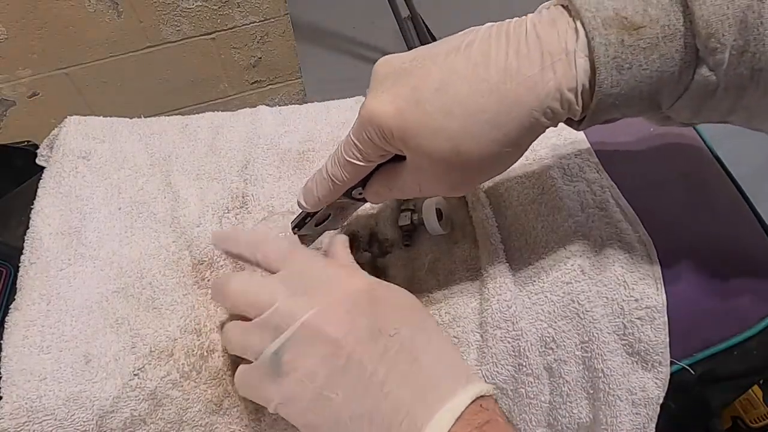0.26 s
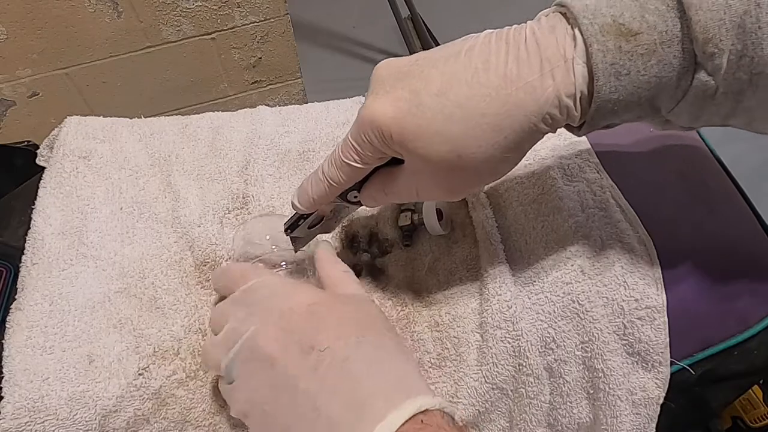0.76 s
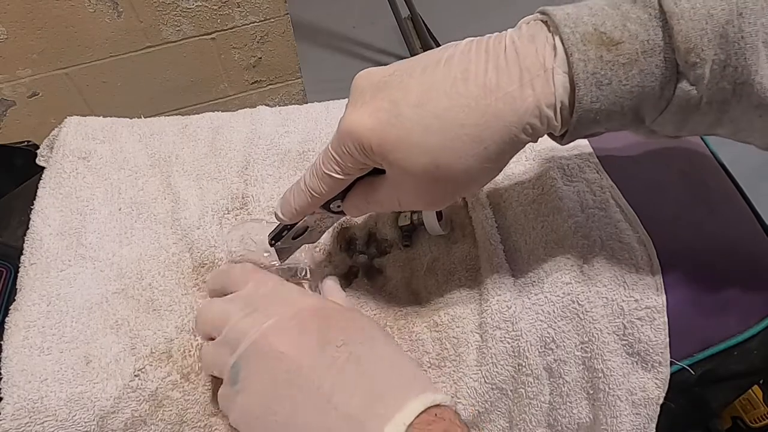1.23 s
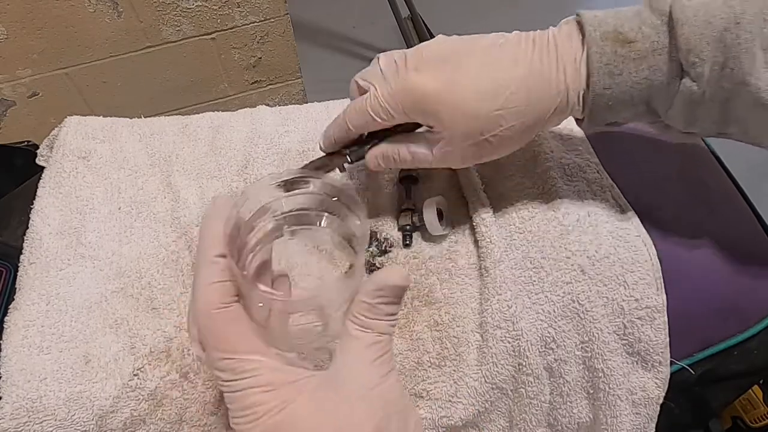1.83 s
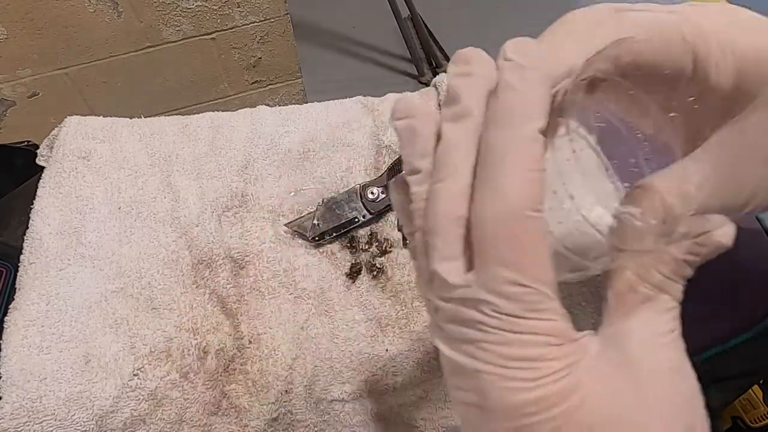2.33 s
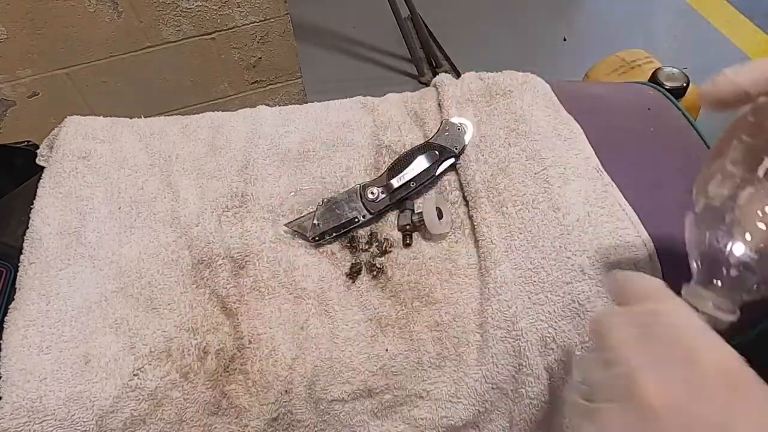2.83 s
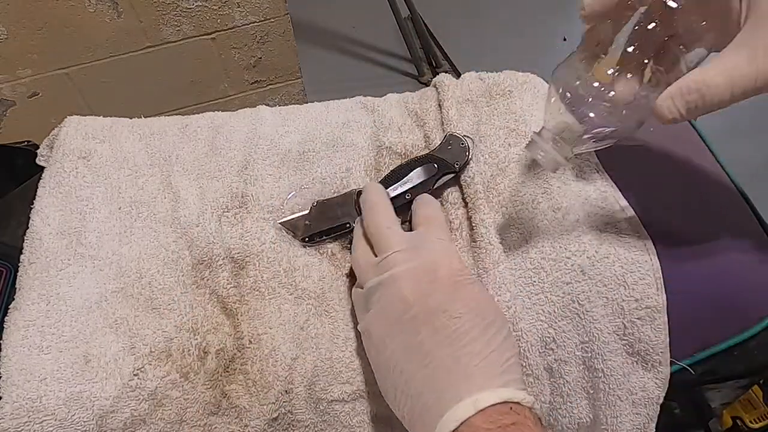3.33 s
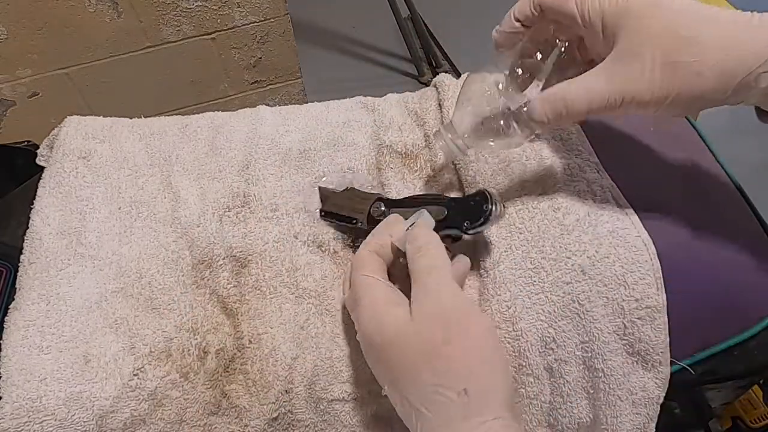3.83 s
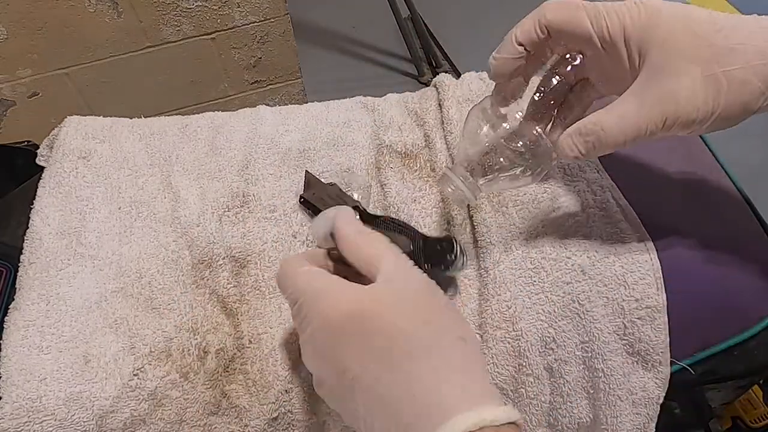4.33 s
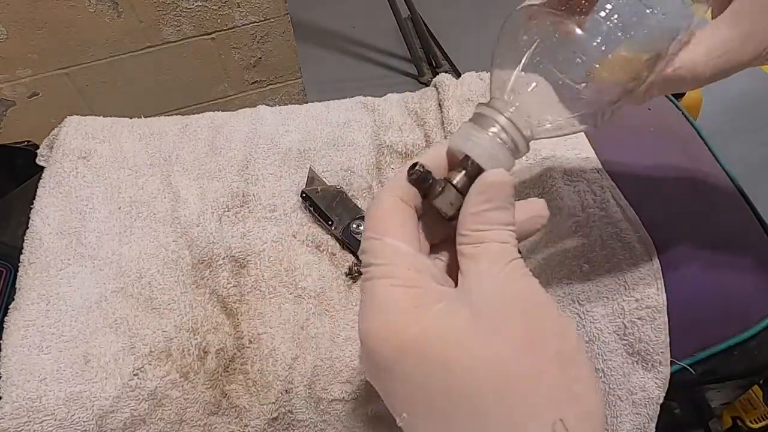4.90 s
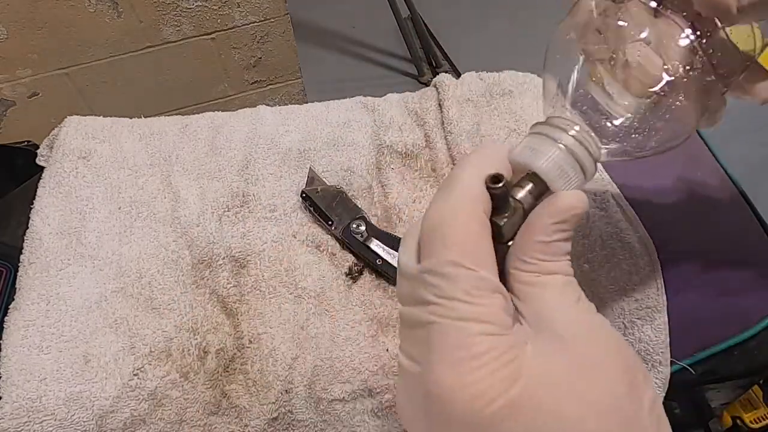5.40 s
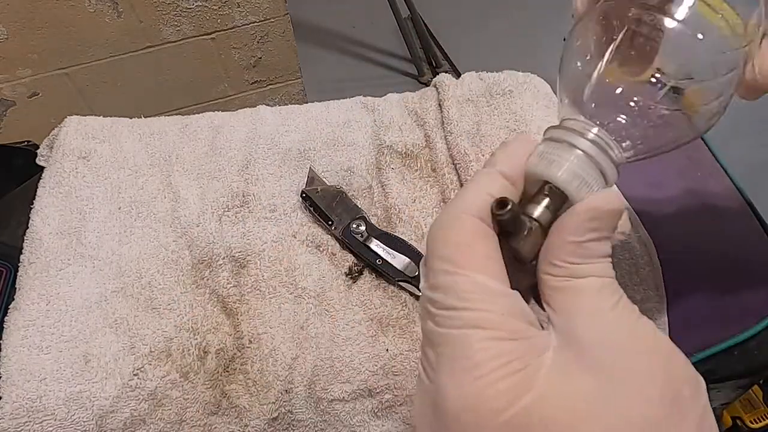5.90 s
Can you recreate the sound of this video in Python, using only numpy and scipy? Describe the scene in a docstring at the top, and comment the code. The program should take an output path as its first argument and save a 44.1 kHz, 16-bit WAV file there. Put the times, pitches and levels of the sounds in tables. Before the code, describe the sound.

Gloved hands cut a thin plastic bottle with sharp crackles and hollow pops, then a knife and small metal parts clink.

```python
"""A quiet workshop, where gloved hands cut, squeeze and turn a thin plastic bottle on a towel, close by.
Creases in the wall buckle with a snap and excite the enclosed air, which resonates in a short hoot.
Gloves rub by stick-slip friction, hands bump the padded table, and the knife and small metal parts
clink in their natural modes. Low tones of far machinery and a dull rumble fill the room."""
import sys
import numpy as np
from scipy import signal
from scipy.fft import rfft, irfft, next_fast_len
from scipy.io import wavfile
from scipy.ndimage import uniform_filter1d, map_coordinates

SR = 44100
rng = np.random.default_rng(int(sys.argv[2]) if len(sys.argv) > 2 else 0)


def master_out(mix):
    """Clip the mix to full scale and print it as 16-bit PCM to the path in sys.argv[1]."""
    frames = np.transpose(np.atleast_2d(mix))
    ceiling = np.clip(frames, -1, 1)
    pcm = np.round(ceiling * 32767).astype(np.int16)
    wavfile.write(sys.argv[1], SR, pcm)


N = 271215

# Levels are relative: each source adds its own gain.
# A far engine gaining speed. Each row: time in seconds, firing rate in Hz, first and second order in dB.
ENGINE_ORDERS = [(0, 58.9, -53, -73), (.8, 61.5, -44, -53), (1.5, 66.1, -35, -64.5), (2.2, 69.57, -35, -53),
                 (2.9, 72.5, -45, -63.5), (3.4, 75.3, -50, -57), (3.8, 76.1, -40, -71.5),
                 (4.4, 74.27, -42.5, -59), (5.1, 77.35, -48.5, -56), (5.4, 77.1, -70, -52),
                 (6.15, 79.4, -39.5, -55)]
# A deep wavering hum. Each row: time in seconds, frequency in Hz, level in dB.
HUM_TRACK = [(0, 50.8, -65.5), (2.1, 45.26, -54.5), (2.4, 47.46, -67), (3.0, 45.55, -71), (3.4, 46.3, -44),
             (3.5, 46.4, -66), (3.6, 45.96, -41.5), (3.8, 49.1, -59.5), (4.05, 48.95, -41),
             (4.25, 49.64, -49), (4.55, 49.94, -40), (4.72, 50.25, -51.5), (4.9, 52.66, -43.5),
             (5.2, 51.3, -66), (5.6, 44.45, -74), (5.9, 44.67, -51),(6.15, 46.9, -44.5)]
# Spectrum of the rumble. Each row: frequency in Hz, spectral density in dB.
RUMBLE_SPECTRUM = [(12, -34.5), (20, -6), (53, -1.5), (140, -3.5), (226, -10.5), (282, -21.5), (544, -28.5),
                   (700, -33), (910, -63), (1540, -120)]
# Envelope of the rumble. Each row: time in seconds, level in dB.
RUMBLE_ENVELOPE = [(0, -45.5), (.8, -54), (2, -52.5), (2.7, -55), (3.5, -49.5), (4.5, -51), (5.3, -52),
                   (6.15, -57)]
# Strokes of gloves, plastic and metal. Each row: peak time in seconds, rustle in dB, hollow over
# rustle in dB, wall resonance in Hz, fade in dB per second, tilt in dB per octave.
RUB_STROKES = [(.09, -59.5, 0, 1360, 61, -2), (.14, -35, 8.5, 2240, 302.5, 0.5),
               (.28, -44.5, -5, 2300, 93, -2), (.36, -49, 9, 2465, 66.5, -1.5), (.5, -44, 6.5, 2662, 49, 2),
               (0.638, -46, 14, 2328, 105, -2.5), (0.762, -38.5, 5, 2236, 74, -0.5),
               (1.03, -50.5, -17, 2200, 100, 3.5), (1.091, -48, -12, 2370, 100, -3),
               (1.288, -51, 6, 2230, 125, -3), (1.43, -40.5, 9.5, 1352, 99.5, 0),
               (1.62, -60.5, 9, 1388, 31, -1), (1.736, -52.5, -15, 3310, 299, 5),
               (2.03, -46, -20, 2848, 100.5, 1), (2.12, -51, -14, 2715, 56.5, -2),
               (2.199, -56.5, 6, 2700, 56.5, -4), (2.57, -49.5, -20, 2970, 190.5, -1),
               (2.648, -49, -1, 1621, 18.5, 1), (2.746, -45, -8, 1700, 499.5, 5),
               (2.866, -42.5, 4, 1916, 409.5, 2), (2.929, -60, 6, 1364, 83, -1),
               (3.042, -51, -18, 1336, 99.5, 1.5), (3.22, -53.5, -23, 2600, 59, -4),
               (3.35, -47.5, -2, 1960, 130, -1), (3.48, -54, -21.5, 2727, 29.5, -7),
               (3.661, -41, 3.5, 2047, 106.5, -1.5), (3.958, -50.5, -12, 2263, 47.5, 2.5),
               (4.101, -52, -4, 2905, 52, -1), (4.249, -53.5, -3, 2940, 159, 2),
               (4.36, -52.5, -31, 2913, 62.5, 1.5), (4.61, -61, -27, 2840, 53.5, 4.5),
               (4.968, -57.5, 13, 1364, 88, 1.5), (5.223, -56.5, 4.5, 1883, 24, -1.5),
               (5.32, -56, -1, 1422, 18, 0.5), (5.55, -56.5, -3.5, 1407, 42.5, -1),
               (5.711, -60, -2, 1345, 83, 0), (5.95, -61.5, 4.5, 1376, 28, 1), (6.1, -57, 9, 2936, 54, 5.5)]
# Faint friction between strokes. Each row: time in seconds, rustle in dB, hollow over rustle in dB.
RESTING_FRICTION = [(0, -47, 10), (.45, -60.5, -18), (.95, -63, 16.5), (1.2, -60, 8), (1.95, -58.5, -25),
                    (2.5, -63, 5.5), (3.0, -75, 12.5), (3.5, -54.5, 4.5), (4.3, -60.5, -19.5),
                    (4.9, -74.5, 14.5), (5.19, -81, 6), (5.5, -74, 3), (5.86, -80, 8), (6.15, -67, -4)]
# Texture of the rubbing. Each row: time in seconds, ticks over smooth friction in dB,
# jingle over rustle in dB, height of the wall resonances in dB.
RUB_TEXTURE = [(0, -13, -48.5, 1), (1.5, -18, -45.5, 4.5), (1.92, -22.5, -37.5, 4.5),
               (2.05, -6, -39.5, 11.5), (2.55, -13.5, -43, 2.5), (2.7, -15, -38, 18),
               (3.1, -12.5, -32, 2.5), (3.25, -1.5, -8, 2.5), (4.06, -15.5, -11, 11), (4.1, -2.5, -21, 9.5),
               (5.15, -16, -37.5, 0), (6.15, -13.5, -41, 9.5)]
# Spectrum of the rustle. Each row: frequency in Hz, spectral density in dB.
RUSTLE_SPECTRUM = [(500, -28), (1100, 6), (1600, 0.5), (3000, -1), (4500, -4.5), (7000, -13), (9500, -15.5),
                   (13000, -41), (15000, -35.5), (16500, -57.5)]
# Dull drag through the padded table. Each row: frequency in Hz, spectral density in dB.
TOWEL_SPECTRUM = [(120, -14), (250, 2.5), (400, -2), (600, -15), (1000, -37.5)]
# Creases flipping. Each row: start in seconds, snap level in dB, panel frequency in Hz,
# crack over snap in dB, hoot level in dB.
CREASE_FLIPS = [(.062, -32, 2165, -6, -31), (.0657, -39.5, 1400, -3, -30),
                (0.0685, -24.5, 1353, -20.5, -37.5), (0.0753, -38, 1400, -1, -20),
                (0.0855, -36, 1400, -6, -27), (0.097, -27, 4740, -1.5, -58), (0.1037, -22, 1490, -8, -12),
                (.1125, -33, 1490, -15, -21.5), (.1209, -40.5, 1490, -12, -28),
                (0.1384, -22, 1450, -5.5, -21), (0.1439, -21.5, 2870, -17.5, -17),
                (.1527, -30, 2890, -8, -30), (0.158, -15, 3375, -3, -31.5), (0.2088, -25, 1370, -4, -26),
                (.225, -25, 2336, -11, -26.5), (0.2751, -17, 3760, -5.5, -54.5), (.28, -30, 4440, 3.5, -16),
                (0.35, -31.5, 2170, -4.5, -31.5), (0.394, -32.5, 1910, -10, -46),
                (0.4306, -21.5, 2534, -49, -23), (0.445, -33.5, 2400, -21, -39),
                (0.4674, -21.5, 1380, -21.5, -28), (0.489, -8.5, 3770, -10.5, -58),
                (0.5047, -29, 2364, -32.5, -20.5), (0.6193, -21.5, 2000, -14, -32),
                (0.6233, -20.5, 1465, -3.5, -52), (0.6295, -20.5, 3950, -9, -13),
                (.652, -33.5, 2040, -7, -48.5), (0.734, -27.5, 2400, -13, -25.5),
                (0.743, -10, 2336, -8.5, -17.5), (.753, -16, 1954, -30.5, -17.5),
                (0.7784, -24.5, 2080, -7, -21.5), (0.7966, -35.5, 1660, 5, -19.5),
                (0.8184, -30, 3400, 4.5, -37), (1.0146, -26, 2286, -5.5, -42),
                (1.0287, -22.5, 4900, -1, -40), (1.0672, -28, 3250, -25, -34),
                (1.0774, -30, 2400, -26, -45), (1.0823, -34, 2302, -16, -35),
                (1.1011, -27.5, 2270, -13.5, -28.5), (1.134, -34, 1920, -15, -42),
                (1.2765, -30.5, 2360, -14.5, -34), (1.2817, -25, 2265, -25, -41),
                (1.2867, -23, 2230, -35, -35), (1.295, -17.5, 2265, -7.5, -24.5),
                (1.388, -27, 1902, -2.5, -22.5), (1.398, -25.5, 1410, -8, -20.5),
                (1.4114, -14.5, 4990, -13.5, -24), (1.4187, -15.5, 1330, -2.5, -17.5),
                (1.426, -34, 2645, 1, -34), (1.443, -41, 2470, 2, -18.5), (1.4521, -21, 1750, 4, -14.5),
                (1.476, -36, 2700, -3, -41), (1.602, -38, 2300, -7.5, -63), (1.65, -47, 1700, -7, -52),
                (2.5605, -39, 2950, -8.5, -43), (2.5687, -36, 2030, -11, -41), (2.575, -31, 2030, -30, -43),
                (2.868, -50, 1900, -18, -49), (2.8734, -48, 1865, -7.5, -30),
                (2.877, -30.5, 2130, -13, -59), (3.6457, -38, 1545, -33.5, -18.5),
                (3.6713, -41, 2100, -5.5, -28.5), (4.8559, -43, 4360, -10.5, -46),
                (4.8674, -43.5, 1405, -6, -30), (4.951, -37, 3030, -1, -23.5),
                (4.9856, -34.5, 2860, -11, -28), (5.05, -54, 4540, -4, -48), (5.096, -57, 2940, -9, -46),
                (5.207, -57, 1300, -30, -44), (5.2221, -42, 1504, -22, -39.5),
                (5.308, -47, 1685, -5.5, -49), (6.0461, -64.5, 2693, 11, -38.5)]
# Spectrum of a contact's crack. Each row: frequency in Hz, level in dB.
CRACK_SPECTRUM = [(300, -34), (1000, 7), (2500, 4), (5000, 2), (8000, -8), (11000, -10.5), (14000, -24.5),
                  (16500, -52)]
# Air resonance as the bottle opens and is gripped. Each row: time in seconds, frequency in Hz.
CAVITY_PITCH = [(0, 747), (.7, 819), (1.45, 894), (2.87, 1017), (3.65, 930), (5, 830), (6.15, 737)]
# Bumps on the table. Each row: start in seconds, level in dB, frequency in Hz, T60 in seconds.
TABLE_BUMPS = [(0.068, -35.5, 130, 0.15), (0.1414, -25.5, 189, 0.036), (0.294, -29.5, 126, 0.052),
               (0.751, -38, 155, 0.068), (1.519, -31, 138, 0.076), (2.0134, -25, 174, 0.027),
               (2.186, -38.5, 200, 0.067), (2.39, -43, 403.5, 0.013), (3.353, -41, 246, 0.073),
               (3.647, -29.5, 236, 0.033), (4.103, -42, 248.4, 0.064), (4.245, -43, 313, 0.081),
               (4.164, -46, 506, 0.032), (4.4448, -11.5, 91, 0.031), (4.952, -27.5, 300, 0.0078)]
# Knocks of metal. Each row: start in seconds, level in dB, main mode in Hz, crack over knock in dB.
METAL_KNOCKS = [(1.9743, -7, 2907, -17.5), (1.986, -19, 3045, -24), (2.0117, -14, 3620, -7.5),
                (2.0197, -16, 2581, -14), (2.0278, -25.5, 2870, -23.5), (2.0327, -22, 2550, -16),
                (2.038, -21.5, 3087, -19), (2.0507, -25, 2860, -33), (2.1105, -26, 2902, -36),
                (2.1705, -28.5, 2530, -28), (2.186, -29.5, 2014, -18.5), (2.264, -27, 2494, -22),
                (2.2865, -38, 2670, -22), (3.143, -36.5, 1727, -36), (3.1581, -37.5, 4280, -12),
                (3.214, -38.5, 1756, -9), (3.2772, -23, 2585, -14.5), (3.3483, -35, 1370, -9),
                (3.3644, -38.5, 1740, -20), (3.3725, -32, 1818, -21), (3.4693, -25.5, 2877, -18.5),
                (3.5043, -25.5, 2983, -9.5), (3.5085, -21, 2770, -23), (3.5383, -27.5, 2665, -20),
                (3.5863, -34.5, 1720, -15.5), (3.6456, -11.5, 1649, -7), (3.6498, -24.5, 1775, -21),
                (3.675, -24, 2150, -12), (3.7115, -30, 2377, -6), (3.7224, -23.5, 3653, -36),
                (3.7278, -24.5, 2560, -12.5), (3.7561, -42, 2460, 1.5), (3.7686, -24, 2444, -12.5),
                (3.8464, -27, 2335, -15), (3.8926, -30, 3800, -9), (3.9249, -30, 3967, -2.5),
                (3.9544, -29.5, 2465, -7), (3.9725, -36, 2400, 4), (3.9868, -33.5, 2170, -8),
                (4.0235, -33.5, 6040, -18.5), (4.036, -32.5, 4336, -15.5), (4.048, -39, 5960, -18.5),
                (4.0792, -34, 3390, -7), (4.0969, -10, 2805, -14), (4.106, -24, 2895, -7),
                (4.1657, -36.5, 1770, -0.5), (4.185, -35.5, 2440, -22), (4.2025, -23.5, 2630, -19.5),
                (4.247, -38.5, 2235, -1), (4.255, -29, 2797, -16), (4.269, -27, 3130, -12.5),
                (4.3436, -23, 3600, -12.5), (4.381, -34, 3890, -9.5), (4.4331, -32.5, 4800, -5),
                (4.4412, -21, 2735, -15.5), (4.4539, -29, 2345, -27), (4.5329, -37.5, 4930, -13)]
# Modes of the metal parts. Each row: frequency in Hz, level in dB.
METAL_MODES = [(2200, -12.5), (2950, -11.5), (3800, -14), (4400, -11), (5950, -18)]
# Reverberation of the workshop. Each row: frequency in Hz, T60 in seconds.
ROOM_T60 = [(300, 0.23), (800, 0.05), (2000, 0.092), (6000, 0.056), (14000, 0.11)]
# Stereo width. Each row: frequency in Hz, side over mid in dB.
SIDE_SPECTRUM = [(300, -62), (1500, -67.5), (3000, -40.5), (6000, -26.5), (10500, -21.5), (12000, -1.5)]


def amp(db):
    """Amplitude ratio of a level in decibels."""
    return 10 ** (np.asarray(db) / 20)


def unit(x):
    """Normalisation to an rms of 1."""
    return x / np.sqrt(np.mean(x ** 2) + 1e-20)


def along(points, hz):
    """Interpolation of (Hz, value) points on a logarithmic frequency axis."""
    f, v = np.transpose(points)
    return np.interp(np.log(hz + 1), np.log(f + 1), v)


def curves(rows):
    """Linear interpolation of each column after the time, one value a sample."""
    s, *cols = np.transpose(rows)
    return [np.interp(np.arange(N) / SR, s, c) for c in cols]


def wobble(rate):
    """Smooth random modulation with rate knots a second."""
    return map_coordinates(rng.standard_normal(int(N * rate / SR) + 4), [np.arange(N) * rate / SR])


def filtered(x, response):
    """Filtering as multiplication of the spectrum by a frequency response."""
    m = next_fast_len(x.shape[-1] + 4096)
    return irfft(rfft(x, m) * response(np.fft.rfftfreq(m, 1 / SR)), m)[..., :x.shape[-1]]


def placed(times, rows):
    """Superposition of short sounds, each starting at its time."""
    at = np.round(times * SR).astype(int)[:, None] + np.arange(rows.shape[1])
    return np.bincount(at.ravel(), rows.ravel(), N + rows.shape[1])[:N]


def ring(t, hz, t60, rise):
    """Free vibration of a damped mode, with an onset time constant of rise seconds."""
    return np.sin(2 * np.pi * hz * t) * amp(-60 * t / np.clip(t60, .002, 1)) * (1 - np.exp(-t / rise))


def engine(throb_hz=5.88, throb_peak_s=1.7, throb_ends_s=2.93):
    """Periodic firing gives two harmonics; for a while the lower one throbs in amplitude."""
    firing_hz, first_db, second_db = curves(ENGINE_ORDERS)
    phase = 2 * np.pi * np.cumsum(firing_hz + 1.1 * wobble(8.3)) / SR
    t = np.arange(N) / SR
    throb = 1 + .9 * (t < throb_ends_s) * np.cos(2 * np.pi * throb_hz * (t - throb_peak_s))
    first = amp(first_db - 9 + 1.6 * wobble(4.3)) * throb * np.sin(phase)
    second = amp(second_db - .5 + 3.4 * wobble(7.3)) * np.sin(2 * phase)
    return first + second


def hum():
    """A deep tone of far machinery wavers by random amplitude and frequency modulation."""
    hz, db = curves(HUM_TRACK)
    envelope = amp(db + 6 + 1.7 * wobble(11))
    return envelope * np.sin(2 * np.pi * np.cumsum(hz + .82 * wobble(17)) / SR)


def rumble():
    """Low-frequency noise swells and sinks under slow amplitude modulation."""
    noise = unit(filtered(rng.standard_normal(N), lambda f: amp(along(RUMBLE_SPECTRUM, f))))
    return amp(curves(RUMBLE_ENVELOPE)[0] + 1.8 * wobble(5)) * noise


def strokes(swell_db_per_s=303, release_db_per_s=198, resting_hz=1390):
    """Incoherent strokes add in power; the loudest sets the resonance, and tilt is a weighted mean."""
    s, db, hollow_db, hz, fade, tilt_db = np.transpose(RUB_STROKES)[:, :, None]
    t = np.linspace(0, N / SR, num=3000)
    rest_db, rest_hollow_db = np.array(curves(RESTING_FRICTION))[:, (t * (SR - 1)).astype(int)]
    envelope_db = np.minimum(swell_db_per_s * (t - s), np.abs(fade) * (s - t))
    since_next_peak_s = np.maximum(t - np.append(s[1:], N / SR)[:, None], 0)
    power = amp(2 * (db + envelope_db - release_db_per_s * since_next_peak_s))
    rest = amp(2 * rest_db)
    total = power.sum(axis=0) + rest
    hollow = (power * amp(2 * hollow_db)).sum(axis=0) + rest * amp(2 * rest_hollow_db)
    peak_hz = np.where(power.max(axis=0) > .5 * rest, hz[power.argmax(axis=0), 0], resting_hz)
    tilt_db = (power * tilt_db).sum(axis=0) / total
    return curves(np.transpose([t, 10 * np.log10(total), 10 * np.log10(hollow), peak_hz, tilt_db]))


def ticks(count):
    """Stick-slip: tiny catches at random moments each ring for a few cycles at their own pitch."""
    when, size, pitch = rng.random((count, 3)).T[:, :, None]
    hz = 1800 * 4.5 ** pitch
    catches = amp(16 * size ** 2) * ring(np.arange(400) / SR, hz, 6 / hz, .0001)
    return unit(placed(when[:, 0] * N / SR, catches))


def wall_rustle(peak_hz, tilt_db, grit_db, depth_db):
    """Source and filter: smooth friction and ticks are coloured by two resonances of the wall."""
    peak_hz = peak_hz * np.exp(.07 * wobble(30))  # the grip keeps changing
    smooth = rng.standard_normal(N) * amp(1.6 * wobble(35))
    slips = (smooth + amp(grit_db) * ticks(count=2200)) / np.sqrt(1 + amp(2 * grit_db))
    hz, t, spectrum = signal.stft(slips, SR, nperseg=256)
    hz, at = hz[:, None] + 1, np.clip((t * SR).astype(int), 0, N - 1)
    bump = lambda centre_hz, octaves: np.exp(-(np.log2(hz / centre_hz) / octaves) ** 2)
    patches = uniform_filter1d(uniform_filter1d(rng.standard_normal(spectrum.shape), 4, 0), 12, 1)
    colour_db = along(RUSTLE_SPECTRUM, hz) + tilt_db[at] * np.log2(np.maximum(hz, 1300) / 3000)
    colour_db += 1.6 * unit(patches)
    colour_db += depth_db[at] * (bump(peak_hz[at], .2) + .66 * bump(3950, .19))
    return unit(signal.istft(spectrum * amp(colour_db), SR, nperseg=256)[1][:N])


def stirred_air(centre_hz=900, width_hz=330):
    """Forced vibration: friction noise drives the hollow, two like band-pass resonators in series."""
    drive = rng.standard_normal(N) * amp(2.5 * wobble(40))
    resonator = lambda f: f * width_hz / np.abs(centre_hz ** 2 - f * f + 1j * f * width_hz)
    return unit(filtered(drive, lambda f: resonator(f) ** 2))


def towel_drag():
    """The padded table transmits only the low frequencies of sliding friction."""
    friction = rng.standard_normal(N) * amp(3.5 * wobble(20))
    return unit(filtered(friction, lambda f: amp(along(TOWEL_SPECTRUM, f))))


def jingle(count):
    """Random impacts of loose parts each excite a tone near one of the two highest metal modes."""
    when, size, which, detune = rng.random((count, 4)).T[:, :, None]
    hz = np.where(which < .5, METAL_MODES[-1][0], METAL_MODES[-2][0]) * (1 + .1 * (detune - .5))
    touches = amp(14 * size ** 2) * ring(np.arange(1024) / SR, hz, t60=.015, rise=.0006)
    return unit(placed(when[:, 0] * N / SR, touches))


def rubbing():
    """Sliding friction: each stroke excites the wall, the hollow, the towel and loose metal together."""
    rustle_db, hollow_db, peak_hz, tilt_db = strokes()
    grit_db, jingle_db, depth_db = curves(RUB_TEXTURE)
    rustle = wall_rustle(peak_hz, tilt_db, grit_db, depth_db)
    hollow = amp(hollow_db - 8.5) * stirred_air()
    drag = amp(-11.5) * towel_drag()
    metal = amp(jingle_db - 4 + 3.5 * wobble(15)) * jingle(count=2500)
    return amp(rustle_db - .58) * (rustle + metal + drag) + hollow


def contacts(table, usual_t60, neighbours_hz, neighbours_db,
             dull_db, thin_hz, tail_db, least_rise, ring_db, swing_db):
    """Impulsive excitation: each click is a main mode, its neighbours and a broadband crack."""
    s, db, hz, crack_db = np.transpose(table)[:, :, None]
    t = np.arange(2048) / SR
    t60 = usual_t60 * amp(-.24 * (db + 14))  # hard contacts die sooner
    rise = least_rise + .047 * t60  # long rings start softly
    cycles = hz * t - 1  # counted from the middle of the sharp first swing
    swing = np.sin(2 * np.pi * cycles) * np.exp(-(cycles / .6) ** 2)
    tones = amp(ring_db) * ring(t, hz, t60, rise) + amp(swing_db + .12 * (db + 20)) * swing
    for near_hz, near_db in zip(neighbours_hz.T, neighbours_db.T):
        tones += amp(near_db[:, None]) * ring(t, near_hz[:, None], t60, rise)
    tones += amp(tail_db) * ring(t, hz, t60=.043, rise=.0037)
    colour_db = lambda f: along(CRACK_SPECTRUM, f) - dull_db * np.log2(1 + (f / 7000) ** 4)
    response = lambda f: amp(colour_db(f)) / (1 + (thin_hz / (f + 1)) ** 4)
    hiss = unit(filtered(rng.standard_normal((len(s), len(t))), response))
    decay = amp(-60 * t / (.52 * t60)) + amp(-22.5 - 60 * t / .069)
    crack = amp(crack_db + 6.5) * hiss * decay * (1 - np.exp(-t / (.46 * rise)))
    # A faint hiss and narrow-band noise swell just before each click.
    slow_noise = uniform_filter1d(uniform_filter1d(rng.standard_normal(hiss.shape), 50), 50)
    narrow_band = unit(slow_noise * np.sin(2 * np.pi * hz * t))
    build_up = amp(db - 60 * t[::-1] / .03) * (1 - np.exp(-t[::-1] / .00063))
    lead_in = (amp(crack_db - 18.5) * hiss + amp(-20.5) * narrow_band) * build_up
    return placed(s[:, 0], amp(db) * (tones + crack)) + placed(np.abs(s[:, 0] - t[-1]), lead_in)


def snaps():
    """Snap-through buckling: a crease flips and rings its panel and three neighbours of random pitch."""
    chance = rng.standard_normal((len(CREASE_FLIPS), 6))
    table = np.array(CREASE_FLIPS)[:, :-1]
    panels_hz = table[:, [2]] * np.exp(.42 * np.clip(chance[:, :3], -1.5, 1.5))
    return contacts(table, usual_t60=.016, neighbours_hz=panels_hz, neighbours_db=-12 + 2 * chance[:, 3:],
                    dull_db=1.5, thin_hz=300, tail_db=-41, least_rise=.00005, ring_db=-8.5, swing_db=2.5)


def hoots():
    """Cavity resonance: as the wall bends, the air swells into a short hoot over a dull knock."""
    s, *_, db = np.transpose(CREASE_FLIPS)[:, :, None]
    t, chance = np.arange(4096) / SR, rng.standard_normal((len(s), 5))
    decay_scale_s = .025 * np.exp(.2 * chance[:, [4]])
    hz = np.interp(s, *np.transpose(CAVITY_PITCH)) * (1 + .025 * chance[:, [3]])
    finger_damping = 1 / (1 + (t / (.26 * decay_scale_s)) ** 4)
    main = ring(t, hz, 2.1 * decay_scale_s, .0018) * finger_damping
    # A weaker, slightly higher tone of random pitch is added.
    upper = amp(-6) * ring(t, (1.043 + .14 * np.abs(chance[:, [0]])) * hz, 1.3 * decay_scale_s, .0016)
    wall_knock = amp(-17 + 1.2 * chance[:, [1]]) * ring(t, 380 * np.exp(.43 * chance[:, [2]]), .054, .0031)
    swell = -amp(db - 15) * ring(t[:1024], hz, .022, .00057)[:, ::-1]
    return placed(s[:, 0], amp(db + 4.5) * (main + upper + wall_knock)) + placed(s[:, 0] - t[1023], swell)


def thuds():
    """Cushioned impact: through the towel, hands and bottle excite one low, heavily damped mode."""
    s, db, hz, t60 = np.transpose(TABLE_BUMPS)[:, :, None]
    return placed(s[:, 0], amp(db + 5.5) * ring(np.arange(8192) / SR, hz, t60, rise=.35 / hz))


def clinks():
    """Modal vibration: knife and metal parts ring near the same modes, at new strengths each knock."""
    hz, db = np.transpose(METAL_MODES)
    chance = rng.standard_normal((len(METAL_KNOCKS), 2, len(hz)))
    modes_hz, modes_db = hz * (1 + .026 * chance[:, 0]), db + 4 * chance[:, 1]
    return contacts(METAL_KNOCKS, usual_t60=.013, neighbours_hz=modes_hz, neighbours_db=modes_db,
                    dull_db=5, thin_hz=1727, tail_db=-24, least_rise=.000081, ring_db=-1.5, swing_db=-3.5)


def reverberation(x):
    """Each frequency decays at its own rate; the room's impulse response changes as the bottle moves."""
    out, step, delay = np.zeros(N + SR), SR // 4, 90
    for start in range(0, N, step):
        hz, t, spectrum = signal.stft(rng.standard_normal(SR // 3), SR, nperseg=128)
        tail = signal.istft(spectrum * amp(-60 * t / along(ROOM_T60, hz)[:, None]), SR, nperseg=128)[1]
        wet = signal.fftconvolve(x[start:start + step], tail / np.linalg.norm(tail))
        out[start + delay:][:len(wet)] += wet
    return out[:N]


def scene():
    """The sources superpose almost equally in both channels; only the treble flickers between them."""
    near = snaps() + clinks() + hoots()
    mid = near + amp(-14) * reverberation(near) + thuds() + rubbing() + engine() + hum() + rumble()
    side = filtered(mid * unit(wobble(590)), lambda f: amp(along(SIDE_SPECTRUM, f)))
    return np.array([mid + side, mid - side])


def record(dry, top_hz=16450):
    """Band limiting, with opposite shelves that leave the left channel duller in the highest treble."""
    lean_db = lambda f: along([(10500, .0056), (12000, 1.1)], f) * np.array([[-1], [1]])
    return filtered(dry, lambda f: amp(lean_db(f)) * (f < top_hz))


dry = scene()
out = record(dry)
master_out(out)
```